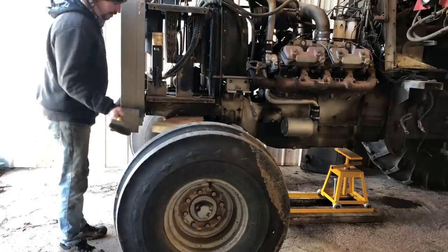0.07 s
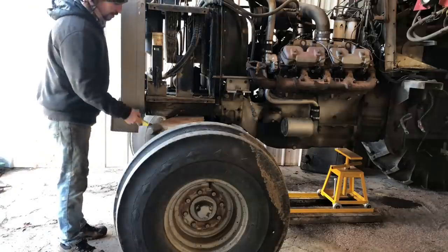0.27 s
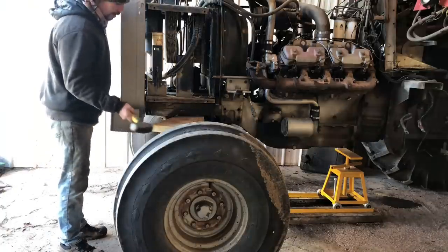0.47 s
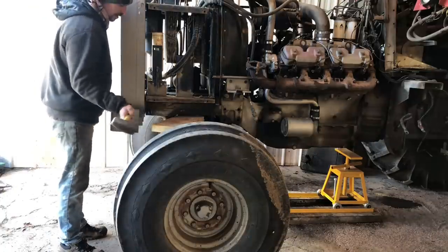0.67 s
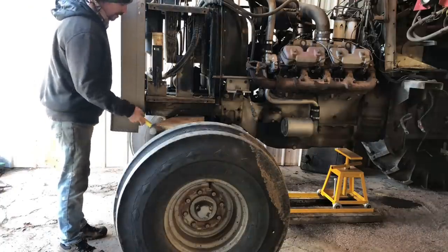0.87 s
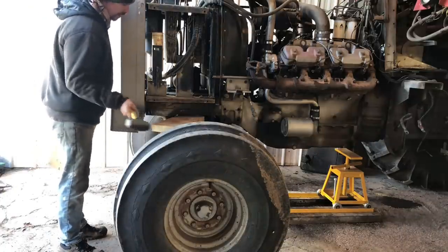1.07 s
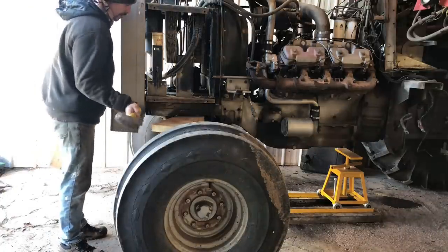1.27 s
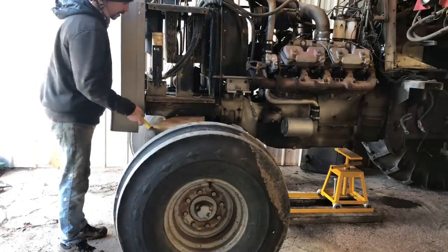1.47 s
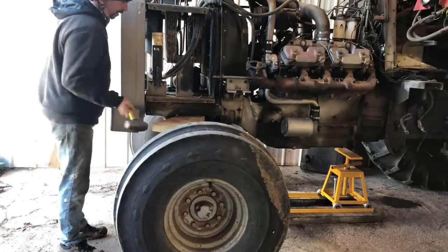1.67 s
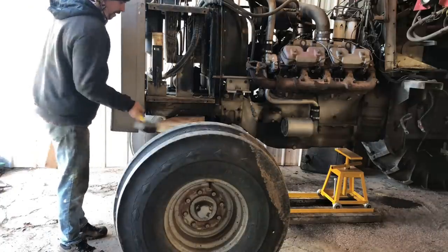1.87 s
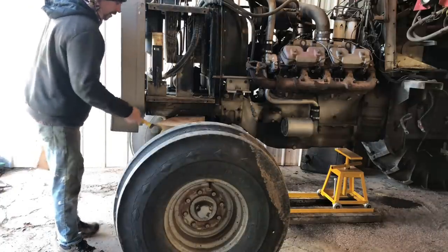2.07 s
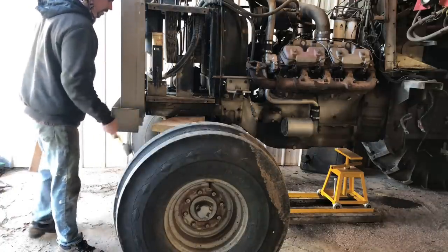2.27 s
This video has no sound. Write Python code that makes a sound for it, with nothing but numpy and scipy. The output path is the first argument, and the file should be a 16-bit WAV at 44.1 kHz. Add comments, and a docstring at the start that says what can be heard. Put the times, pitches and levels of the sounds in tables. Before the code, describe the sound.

A heavy hammer strikes wooden blocks four times, sharp loud cracks echoing in a hard-walled workshop

```python
"""A heavy hammer drives wooden blocks wedged into a tractor frame, in a large hard-walled workshop.
A lighter knock is dying away at the start, over quiet room tone and a few tiny ticks of grit and tool.
Four strong blows follow: each is a noise-burst crack, a short ring of wood modes and a longer ring of
paired steel modes, and fills the shed with an echo of shaped noise.
A look-ahead limiter holds the loud first part of each strong blow just under full level."""
import sys
import numpy as np
from scipy import signal
from scipy.io import wavfile
from scipy.ndimage import uniform_filter1d, minimum_filter1d

SR = 44100
rng = np.random.default_rng(int(sys.argv[2]) if len(sys.argv) > 2 else 0)


def master(y):
    """Save y as 16-bit WAV."""
    cut = np.clip(np.atleast_2d(y).T, -1, 1)
    pcm = np.round(cut * 32767)  # scale
    wavfile.write(sys.argv[1], SR, pcm.astype(np.int16))


N = 101429
LEAD_S = .3   # rendered ahead of the start, so that the first knock is already dying away

# hammer blows: start_s (first touch), strength_db (wood and crack), crack_brightness_db (crack only)
BLOWS = [(-.14, -15.5, 7), (0.2475, 4, 2.5), (0.807, 5, 7.5), (1.3723, 3, 9.5), (1.9124, 0.5, 7.5)]
START_S, STRENGTH_DB, BRIGHTNESS_DB = np.transpose(BLOWS)
TOUCH_AT = np.array([int((s + LEAD_S) * SR) for s in START_S])
FULL_CONTACT_S = 0.003   # the face lands flat this long after its edge touches
FLAT_AT = TOUCH_AT + int(FULL_CONTACT_S * SR)


def amp(db):
    """Decibels to linear amplitude."""
    return 10 ** (np.asarray(db) / 20)


def at_hz(rows, hz):
    """Table columns read on a log-frequency axis."""
    pitch_hz, *columns = np.transpose(rows)
    return [np.interp(np.log(hz), np.log(pitch_hz), column) for column in columns]


def ring(drive, hz, t60):
    """Two-pole resonator: a unit click sets a sine of height 1 ringing, 60 dB down after t60 seconds."""
    radius, angle = amp(-60 / (t60 * SR)), 2 * np.pi * hz / SR
    feedback = [1, -2 * radius * np.cos(angle), radius * radius]
    return signal.lfilter([0, np.sin(angle)], feedback, drive + 1e-18)


def bands(size):
    """Half-octave bands of noise with their centres in Hz; neighbours come from unrelated noise."""
    edges = 25 * 2 ** np.arange(0, 9.6, .5)
    white = rng.standard_normal((2, size))
    for k, (low, high) in enumerate(zip(edges, edges[1:])):
        band = signal.butter(2, [low, high], "band", fs=SR, output="sos")
        yield np.sqrt(low * high), signal.sosfilt(band, white[k % 2])


def wood_blocks():
    """The hammer face lands flat and sets the short, damped modes of the wooden blocks ringing."""
    # modes of the blocks: pitch_hz, t60_s, then relative_level_db in each of the five blows
    wood_modes = [(101.85, 0.051, -17, -26, -26, -31.5, -25), (269, 0.036, -11.5, -13.5, -11.5, -7, -7),
                  (309.7, 0.028, -14, -12, -11.5, -7.5, -7), (442.6, 0.025, -9.5, -19.5, -12, -8, -5),
                  (533, 0.04, -10.5, -32, -13, -8, -6.5), (702.2, 0.045, -10, -2.5, -5, -1, -3),
                  (848.7, 0.03, -4, -1.5, 0, 5, 2.5), (1050, 0.017, 7.5, -3.5, 0, 2, 1),
                  (1260, 0.014, 4, -3, 0.5, 0, -1.5), (1492, 0.023, -1, -2, -3, -2, -9.5),
                  (1658, 0.054, -10.5, -10.5, -3, -4, -15.5), (1889, 0.015, -7, -6.5, 1.5, -4.5, -3.5),
                  (2208, 0.019, -10, -8, -12, -14, -12), (2879, 0.01, -5, -4, -3.5, -1.5, -6.5),
                  (3970, 0.004, -4, 1, -2, -16, -2.5), (5570, 0.022, -14, -16.5, -10.5, -16.5, -11.5),
                  (6730, 0.011, -14, -50, -22, -16.5, -17)]
    rings = np.zeros(N + int(LEAD_S * SR))
    for k, (hz, t60, *level_db) in enumerate(wood_modes):
        clicks = np.zeros(len(rings))
        clicks[FLAT_AT] = amp(STRENGTH_DB + level_db) * (-1) ** k   # neighbouring modes start in opposite sense
        rings += ring(clicks, hz, t60)
    return signal.sosfilt(signal.butter(2, 20, "high", fs=SR, output="sos"), rings)


def crack():
    """The crack is a band-limited click at flat contact and a splintery noise burst from the first touch."""
    snap_db, splinter_db = 10.5, -16   # relative to strength plus brightness
    peak_s = 0.006   # the splinter burst swells for this long, then falls
    snap, splinter = np.zeros((2, N + int(LEAD_S * SR)))
    t = np.arange(600) / SR
    swell = t / peak_s * np.exp(1 - t / peak_s)
    loudness_db = STRENGTH_DB + BRIGHTNESS_DB
    snap[FLAT_AT] = amp(loudness_db + snap_db)
    for i, db in zip(TOUCH_AT, loudness_db + splinter_db):
        splinter[i:i + len(t)] = amp(db) * rng.standard_normal(len(t)) * swell
    crack_band = signal.butter(1, [300, 4230], "band", fs=SR, output="sos")
    return signal.sosfilt(crack_band, [snap, splinter])


def frame():
    """The steel frame rings on after each blow; each mode has a weaker twin slightly higher, so it beats."""
    # pitches of the steel modes, heard from close by: pitch_hz
    frame_hz = [543, 716, 786, 1124, 1672, 1876, 2850]
    # the same modes in the same order: t60_s, then level_db in each of the five blows
    frame_modes = [(0.79, -62, -43.5, -45.5, -35, -28.5), (0.84, -59.5, -28, -35, -36, -59),
                   (0.64, -57.5, -35, -21.5, -25, -21.5), (2.6, -75.5, -60, -55.5, -46.5, -50.5),
                   (0.23, -53.5, -37.5, -25.5, -45, -50), (0.23, -55, -45, -30.5, -39, -46),
                   (0.51, -62, -39, -38.5, -37, -57)]
    twin_ratio, twin_db = 1.006, -11
    out = 0
    for hz, (t60, *level_db) in zip(frame_hz, frame_modes):
        clicks = np.zeros(N + int(LEAD_S * SR))
        clicks[TOUCH_AT] = amp(level_db)
        out = out + ring(clicks, hz, t60) + amp(twin_db) * ring(clicks, hz * twin_ratio, t60)
    return out[-N:]


def shed(x):
    """Diffuse echo that builds up with bumps and slight dips from the walls, and dies on two slopes per band."""
    # echo colour: pitch_hz, relative_level_db, early_t60_s, late_t60_s
    echo_colour = [(86, -9, .6, 1.3), (216, 2, 0.3, 1.01), (472, 5.5, 0.31, 0.82), (1000, -3.5, 0.33, 0.65),
                   (2000, 3, 0.31, 0.67), (4300, -1, 0.32, 0.32), (8000, 2.5, .24, 0.16),
                   (16660, -11.5, .2, 0.087)]
    # bumps and slight dips in the echo: delay_s, level_db (relative to the full diffuse echo), spread_s
    walls = [(.007, 7, 0.0032), (.0275, 6, 0.0019), (0.037, -1.5, .003), (.055, -0.5, 0.0017)]
    echo_db, late_db = -22.5, -22   # late_db is the slow slope relative to the early one
    build_s, wall_dull_hz = 0.016, 4000   # the bumps and dips fade above wall_dull_hz
    t = np.arange(int(.9 * SR)) / SR
    diffuse = 1 - np.exp(-(t / build_s) ** 2)
    bumps = sum((amp(db) - 1) * np.exp(-((t - s) / spread) ** 2) for s, db, spread in walls)
    response = 0
    for hz, noise in bands(len(t)):
        level_db, early_t60, late_t60 = at_hz(echo_colour, hz)
        arrival = diffuse + bumps / (1 + (hz / wall_dull_hz) ** 2)
        decay = amp(-60 * t / early_t60) + amp(late_db - 60 * t / late_t60)
        response = response + amp(echo_db + level_db) * noise * arrival * decay
    return signal.fftconvolve(x, response)[:len(x)]


def air():
    """Quiet room tone: steady noise, strongest in the bass and falling towards the treble."""
    # spectrum of the room tone: pitch_hz, relative_level_db (per Hz)
    air_spectrum = [(30, -14), (60, -4), (120, 0), (250, 0), (500, -2), (1000, -6), (2000, -13),
                    (4000, -23), (8000, -30), (16000, -35)]
    rms_db = -62.5
    out = sum(amp(at_hz(air_spectrum, hz)[0]) * noise for hz, noise in bands(N))
    return amp(rms_db) * out / out.std()


def ticks():
    """Tiny dry clicks of grit and tool: noise bursts of about a millisecond through a band around a pitch."""
    # ticks: start_s, level_db (of the noise before its band filter), pitch_hz (band centre)
    grit = [(0.123, -58, 3000), (.445, -54, 11200), (.739, -51.5, 11100), (.777, -71, 11000),
            (1.215, -61, 9630), (1.266, -47, 2530)]
    decay_s, width = .001, 1.5   # width: band edges as a ratio to the centre
    out, t = np.zeros(N), np.arange(300) / SR
    for s, level_db, hz in grit:
        burst = rng.standard_normal(len(t)) * np.exp(-t / decay_s)
        band = signal.butter(1, [hz / width, hz * width], "band", fs=SR, output="sos")
        out[int(s * SR):][:len(t)] += amp(level_db) * signal.sosfilt(band, burst)
    return out


def scene():
    """Mix of all layers; the wood ring of each blow gets its own randomly drawn echo."""
    first_touch_db, direct_db, snap_direct_db, blows_db = -10.5, 6.5, -28, -7
    rings = wood_blocks()
    snap, splinter = crack()
    # the edge touches first: a weaker copy of the wood ring, ahead of the flat landing
    edge = amp(first_touch_db) * np.roll(rings, TOUCH_AT[0] - FLAT_AT[0])
    direct = amp(direct_db) * (rings + amp(snap_direct_db) * snap + edge + splinter)
    blow_number = np.searchsorted(TOUCH_AT, np.arange(len(rings)), side="right")
    echo = shed(snap)
    for k in range(len(BLOWS)):
        echo = echo + shed(rings * (blow_number == k + 1))
    blows = amp(blows_db) * (direct + echo)
    return (blows[-N:] + frame() + air() + ticks())[None]


def record(dry):
    """A look-ahead limiter whose gain recovers at a steady dB rate, then a steep cut of the top."""
    ceiling_db, release_db_per_s, lookahead_s = -1, 400.5, .001
    stop_hz = 17000   # 70 dB down from here up
    window = 2 * int(lookahead_s * SR) + 1
    release = release_db_per_s * np.arange(N) / SR
    over_db = np.maximum(20 * np.log10(np.abs(dry[0]) + 1e-9) - ceiling_db, 0)
    over_db = -minimum_filter1d(-over_db, window)   # the highest excess within the window
    held_db = np.maximum.accumulate(over_db + release) - release
    limited = dry * amp(-uniform_filter1d(held_db, window))
    return signal.sosfilt(signal.cheby2(12, 70, stop_hz, fs=SR, output="sos"), limited)


dry = scene()
out = record(dry)
master(out)
```